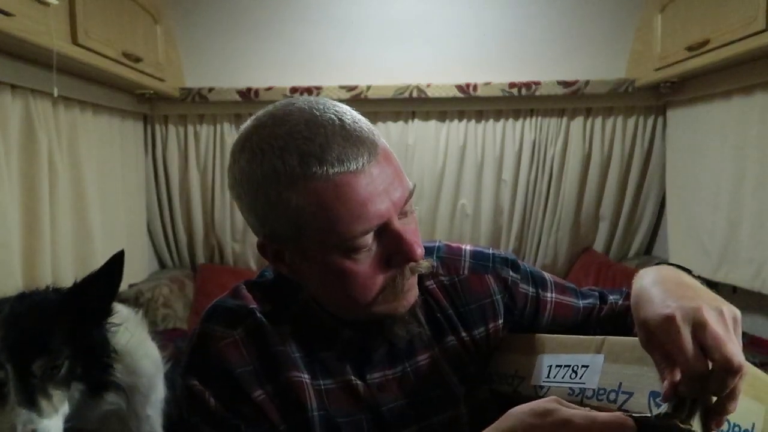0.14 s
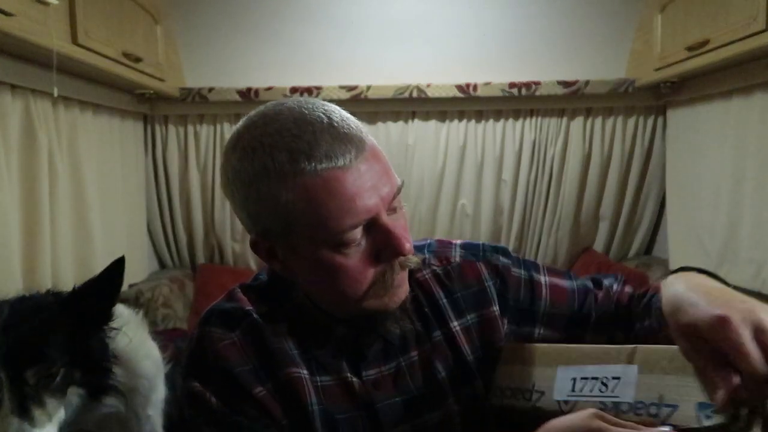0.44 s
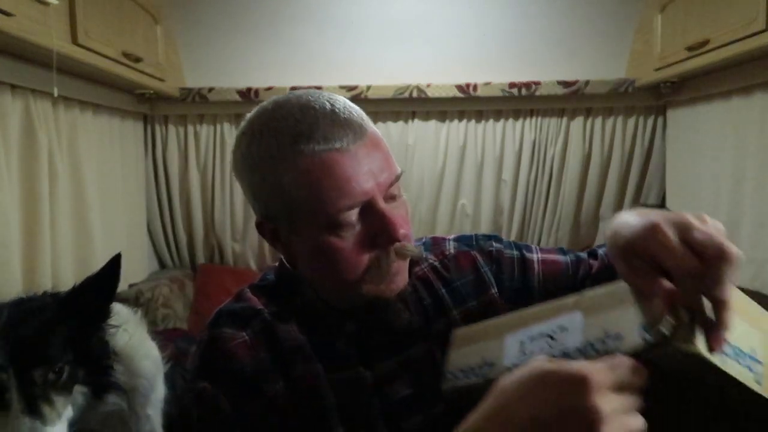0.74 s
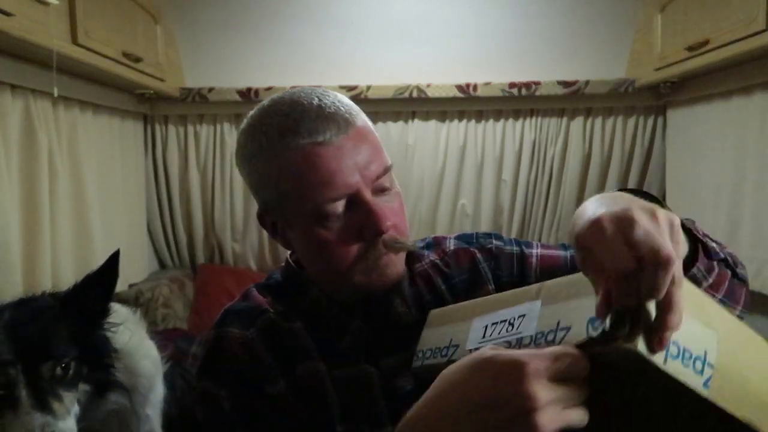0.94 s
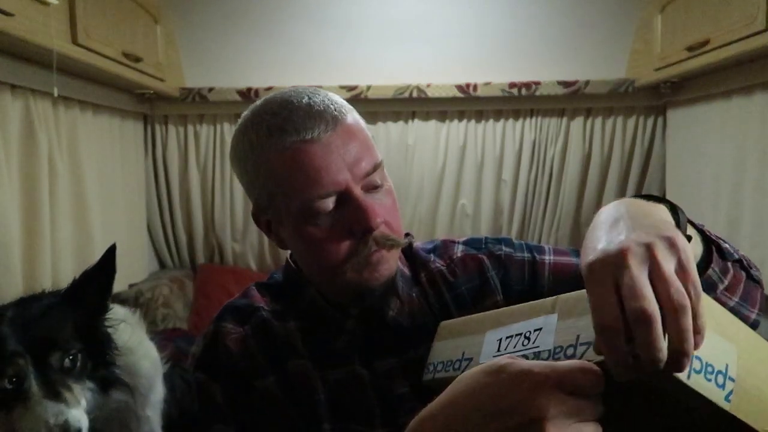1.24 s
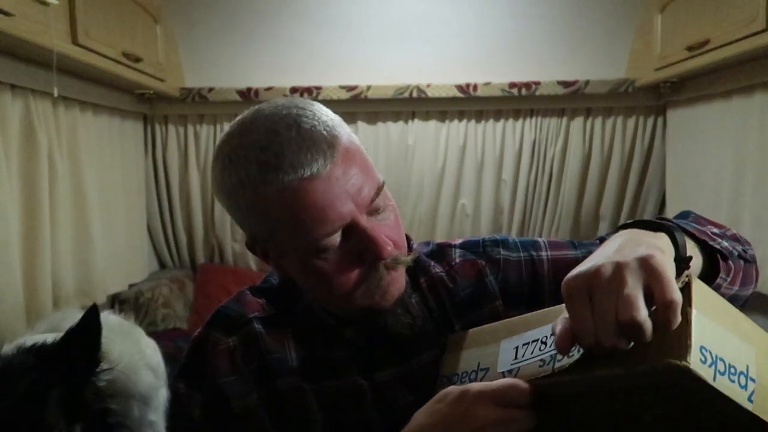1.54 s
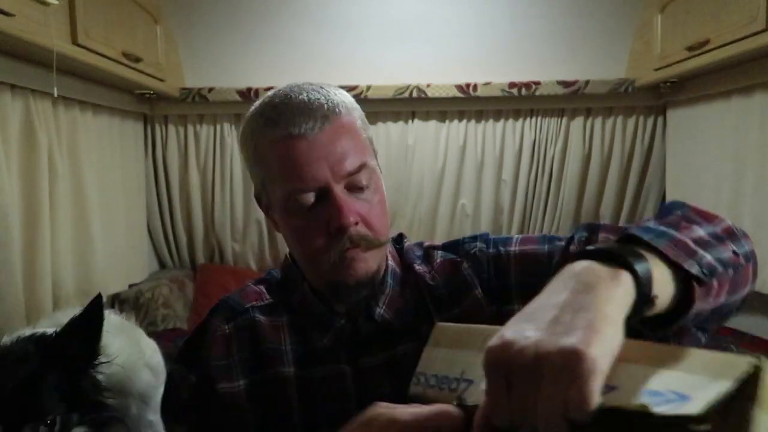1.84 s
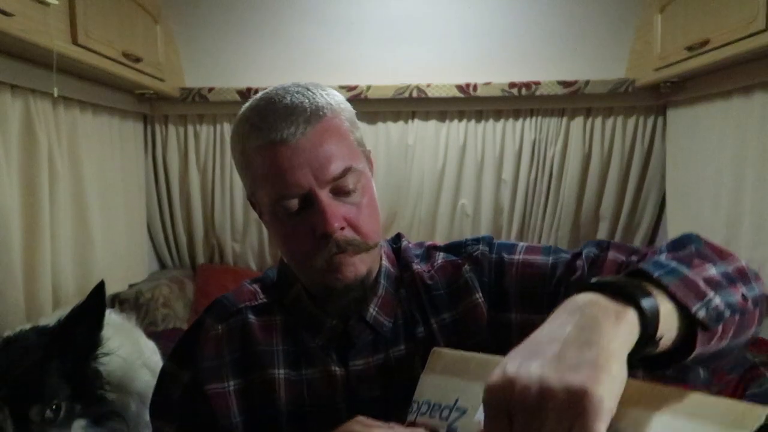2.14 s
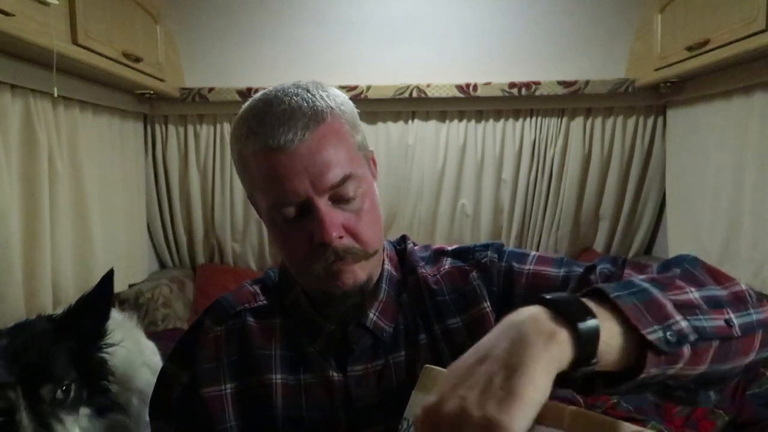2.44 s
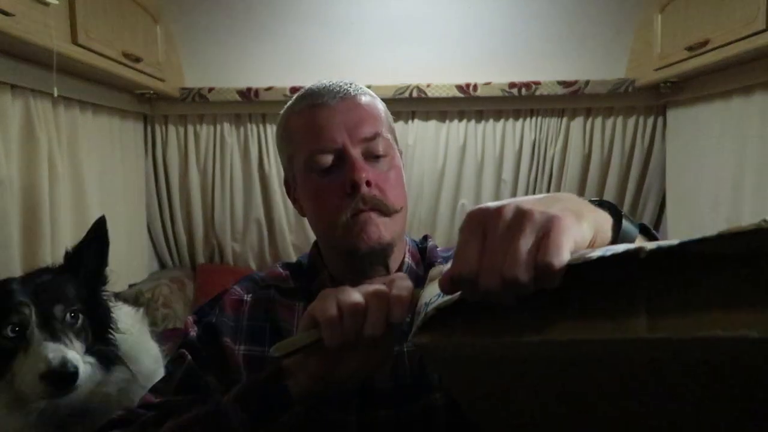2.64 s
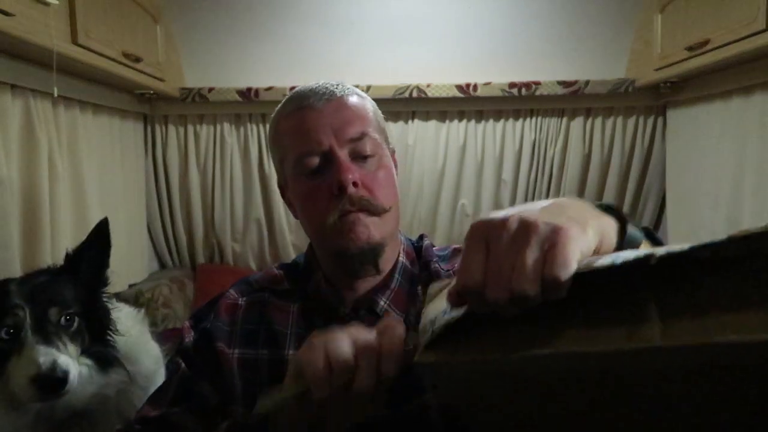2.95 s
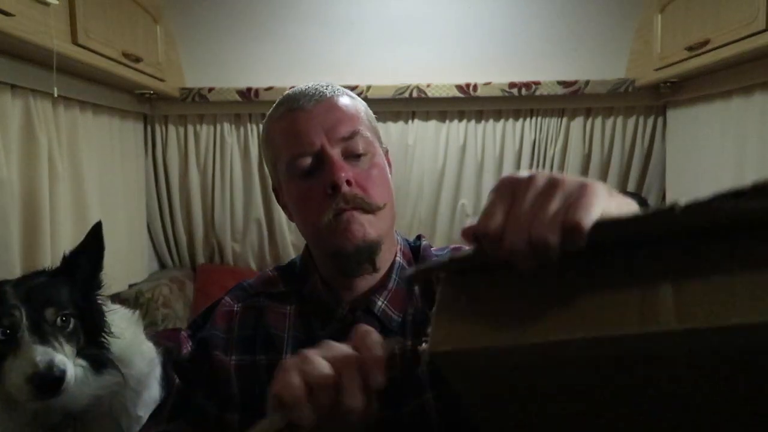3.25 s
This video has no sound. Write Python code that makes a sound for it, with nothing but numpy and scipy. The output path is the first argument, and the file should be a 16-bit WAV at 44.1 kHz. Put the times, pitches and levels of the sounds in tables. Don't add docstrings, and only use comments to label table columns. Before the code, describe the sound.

Cardboard box being cut open in short rasping strokes, with hollow thumps and a final crackling tear.

```python
import sys
import numpy as np
from scipy import signal
from scipy.fft import rfft, irfft
from scipy.io import wavfile
from scipy.ndimage import uniform_filter1d

SR = 44100
rng = np.random.default_rng(int(sys.argv[2]) if len(sys.argv) > 2 else 0)


def waveform_to_disk(signal):
    frames = np.transpose(np.atleast_2d(signal))
    scaled = np.clip(frames, -1, 1) * 32767
    samples = np.round(scaled).astype(np.int16)
    wavfile.write(sys.argv[1], SR, samples)


def rack_gain(trim_db):
    fader = np.asarray(trim_db, float)
    return 10 ** (fader / 20)


N = 149940


def evened(x):
    return x / np.sqrt(np.mean(x ** 2) + 1e-20)


def coloured(x, points):
    f, db = np.transpose(points)
    hz = np.fft.rfftfreq(len(x), 1 / SR)
    gain_db = np.interp(np.log(hz + 1), np.log(f + 1), db, left=db[0] - 30)
    return evened(irfft(rfft(x) * rack_gain(gain_db), len(x)))


def resonate(x, hz, width_hz):
    r = np.exp(-np.pi * width_hz / SR)
    return signal.lfilter([1 - r, 0, r - 1], [1, -2 * r * np.cos(2 * np.pi * hz / SR), r * r], x)


def clicks(per_s, spread_db):
    happens = rng.random(N) < per_s / SR
    sign = rng.choice([-1., 1.], N)
    size = np.minimum(rng.exponential(1, N), 4)
    return evened(happens * sign * rack_gain(spread_db * size))


def flutter(ms, depth_db):
    wander = uniform_filter1d(rng.standard_normal(N), max(int(ms * SR / 1000), 1))
    return rack_gain(depth_db * evened(wander))


def patchy(x, depth_db):
    z = signal.stft(x, nperseg=256)[2]
    field = uniform_filter1d(rng.standard_normal(z.shape), size=9, axis=0)
    field = uniform_filter1d(field, size=14, axis=1)
    return evened(signal.istft(z * rack_gain(depth_db * evened(field)), nperseg=256)[1][:N])


# pitch_hz, width_hz, level_db
BOX_RESONANCES = [(45, 17, -10.5), (99.7, 49, 2.5), (200, 70, 5), (270, 53, 6), (358, 50.6, 4.5),
                  (608, 262, 1), (917, 268, 2), (1400, 228, 1.5), (1556, 790, -3), (2304, 910, -12)]


def box(x):
    out = 0
    for k, (hz, width_hz, db) in enumerate(BOX_RESONANCES):
        out = out + (-1) ** k * rack_gain(db) * resonate(x, hz, width_hz)
    return out


# pitch_hz, density_db (per Hz)
AIR_COLOUR = [(12, -29.5), (20, 0), (251, -16), (361, -6), (440, -4), (4410, -27.5), (4790, -29.5),
              (14700, -37.5), (16500, -37)]


def still_air():
    hiss = coloured(rng.standard_normal(N), AIR_COLOUR)
    return rack_gain(-57) * hiss * flutter(60, 1.0)


TEAR_FROM_S = 2.6
# pitch_hz, density_db (per Hz)
FIBRE_COLOUR = [(1500, -22), (3000, 3), (4200, -2), (5800, 4.5), (7800, 2), (10000, 0.5), (13500, -14),
                (16000, -12)]
# pitch_hz, density_db (per Hz)
TEAR_COLOUR = [(1500, 9), (3500, -7), (5800, 1.5), (8500, -9), (12000, -11.5), (16000, -12.5)]
# start_s, length_s, fizz_db, box_db, bump_db
PALM_SLIDES = [(0., 0.17, -56.5, -45.5, -77), (0.254, 0.4, -60.5, -48, -62),
               (0.595, 0.22, -59, -49.5, -56.5), (0.763, 0.26, -55.5, -49.5, -60.5),
               (0.909, 0.28, -63, -52, -47), (1.161, 0.11, -55.5, -49, -61),
               (1.233, 0.33, -62.5, -52, -54.5), (1.822, 0.066, -61, -45, -56),
               (2.034, 0.19, -49.5, -44, -48), (2.25, 0.19, -56.5, -49, -48), (2.375, 0.21, -49, -49, -48),
               (2.642, 0.18, -62.5, -52, -77), (2.769, 0.15, -60, -51, -64), (2.915, 0.12, -56, -44, -43),
               (3.097, 0.068, -57, -44.5, -36.5), (3.159, 0.073, -54.5, -46, -46),
               (3.221, 0.098, -56, -53, -46.5)]


def palm_rubs():
    t = np.arange(N) / SR
    shape = np.zeros((3, N))
    for start, length, *levels_db in PALM_SLIDES:
        u = np.clip((t - start) / length, 0, 1)
        shape = shape + rack_gain(np.array(levels_db))[:, None] * np.sin(np.pi * u ** 1.03) ** 0.72
    rub_colour = FIBRE_COLOUR[:1] + [(2500, -0.5), (5800, 1.0), (8000, -4.0), (16000, -12.0)]
    grain = coloured(clicks(12000, 3.6), rub_colour)
    ticks = rack_gain(0.5) * (t > TEAR_FROM_S) * coloured(clicks(250, 2.8), TEAR_COLOUR)
    jolts = clicks(3000, 2.35)
    wall = evened(box(jolts) + 0.24 * resonate(jolts, 900, 260)) * flutter(22, 1.5)
    soft_bumps = np.convolve(clicks(160, 1.9), np.hanning(90))[:N]
    bumps = evened(box(soft_bumps))
    return shape[0] * (patchy(grain, 3.0) + ticks) + shape[1] * wall + shape[2] * bumps


# start_s, length_s, level_db, pitch_hz, width_hz
EDGE_DRAGS = [(0.86, 0.13, -61, 7600, 833.3), (2.388, 0.19, -50, 1530, 460),
              (3.116, 0.032, -39.5, 10300, 11000), (0.075, 0.17, -49.5, 2400, 1400),
              (0.051, 0.084, -60, 10000, 2800), (0.364, 0.14, -58.5, 3340, 1400),
              (2.2, .065, -50, 1760, 1100), (3.279, 0.021, -41, 1350, 370), (3.19, 0.033, -55, 1900, 900),
              (1.53, 0.085, -48, 13000, 4000), (0.18, .11, -48, 42, 30), (2.611, 0.033, -48.5, 1450, 2000)]


def squeaks():
    t = np.arange(N) / SR
    slips = clicks(11000, 9.1)
    out = np.zeros(N)
    for start, length, db, hz, width_hz in EDGE_DRAGS:
        swell = np.sin(np.pi * np.clip((t - start) / length, 0, 1)) ** 0.5
        tone = resonate(resonate(slips, hz, width_hz), hz, width_hz)
        out += rack_gain(db) * swell * evened(tone)
    return out


# start_s, length_s, fizz_db, box_db, drift_db (over the stroke)
STROKES = [(0.14, 0.018, -34.5, -37, 1), (0.16, 0.023, -40, -35, -1), (0.168, 0.04, -33.5, -31, -1.5),
           (1.447, 0.091, -50, -46.5, 9.5), (1.533, 0.074, -40.5, -36.5, 2.5),
           (1.614, 0.07, -39, -30, -10.5), (1.693, 0.12, -38.5, -36, -3), (1.876, 0.068, -37.5, -29.5, -7),
           (1.927, 0.035, -30, -28, -4), (1.965, 0.026, -33, -27, 1), (1.991, 0.041, -32.5, -25, -1),
           (2.026, 0.027, -41, -25.5, -16), (2.732, 0.058, -42, -37, -13.5), (2.82, 0.032, -43, -41.5, -3),
           (2.947, 0.019, -42.5, -44, -2), (2.966, 0.015, -49, -45, 5), (3.005, 0.017, -33.5, -23, -2),
           (2.979, 0.026, -35.5, -34, 1.5), (3.002, 0.051, -27.5, -23.5, -2),
           (3.052, 0.059, -42.5, -54, -9), (3.111, 0.029, -39.5, -37.5, -1), (3.276, 0.031, -36, -39, -16),
           (0.071, 0.11, -58, -49.5, 13)]


def cuts_and_tears():
    edge_in_s, edge_out_s = 0.0061, 0.0025
    t, fizz, drum = np.arange(N) / SR, np.zeros(N), np.zeros(N)
    for start, length, fizz_db, box_db, drift_db in STROKES:
        u = t - start
        gate = np.clip(u / edge_in_s, 0, 1) * np.exp(-np.maximum(u - length, 0) / edge_out_s)
        gate = gate * rack_gain(drift_db * np.clip(u / length, 0, 1))
        fizz += rack_gain(fizz_db) * gate
        drum += rack_gain(box_db) * gate
    jolts = clicks(per_s=2500, spread_db=3)
    crackle = clicks(per_s=12000, spread_db=4.5)
    cutting = coloured(crackle, FIBRE_COLOUR)
    tearing = coloured(crackle + 0.25 * clicks(700, 5), TEAR_COLOUR)
    crackle = np.where(t < TEAR_FROM_S, cutting, tearing)
    in_air = fizz * flutter(3.2, 1.2) * patchy(crackle, 2.2)
    in_box = box(drum * flutter(6.6, 3.78) * jolts) / np.std(box(jolts))
    return in_air + in_box


# start_s, peak_db, pitch_hz, push_db (weight of the slow push)
WALL_THUMPS = [(.1505, -15, 543, -13), (0.1616, -16, 555, -23), (.1738, -10.5, 560, -24),
               (.181, -10.5, 446, -4), (.7585, -27.5, 566, -22), (.946, -31.5, 517, -6),
               (1.001, -36.5, 241, -1), (1.041, -32, 252, 3), (1.095, -37, 250, 11),
               (1.113, -25.5, 270, 0.5), (1.134, -26.5, 320, -7), (1.398, -32.5, 530, -9),
               (1.536, -15, 260, -42), (1.621, -15, 463, -3.5), (1.7001, -16.5, 455, -0.5),
               (1.884, -7.5, 604, -13), (1.9275, -8.5, 1470, -10), (1.965, -9, 230, -13),
               (2.031, -8, 523, -7), (2.367, -31.5, 1440, -23), (2.613, -28.5, 2250, -28),
               (2.7415, -31.5, 287, -22), (2.9836, -17.5, 200, -25), (3.004, -8, 242, -25),
               (3.046, -10.5, 330, -14), (3.0898, -16, 516, 4), (3.184, -28.5, 500, 0.5),
               (3.2709, -24.5, 1400, -6), (3.282, -25.5, 890, -1), (.081, -32, 880, -12),
               (.122, -34, 890, -13), (.144, -22.5, 710, -15), (0.2058, -21, 586, -11), (.64, -38, 400, -8),
               (1.542, -17.5, 610, -6), (1.607, -31, 302, 2), (1.912, -16, 220, -5), (1.983, -17, 910, -15),
               (2.0007, -18.5, 1120, -6), (2.0115, -17, 910, -10), (2.399, -31.5, 1480, -10),
               (2.0325, -15, 1320, -21), (2.769, -32, 390, -14), (2.839, -27, 233, -5),
               (3.0101, -13, 1290, -3), (3.0378, -12, 305, -24), (3.034, -12, 320, -21),
               (3.136, -26.5, 300, -19), (1.9665, -11.5, 1510, -22), (3.258, -30, 370, -6)]


def thumps():
    ring_q, rattle_s, box_db = 3.12, 0.0043, -5
    out, t = np.zeros(N + 8192), np.arange(8192) / SR
    for start, db, hz, push_db in WALL_THUMPS:
        noise = rng.standard_normal(8192)
        blow = np.sin(np.pi * np.minimum(2.96 * hz * t, 1))
        rattle = np.convolve(noise * np.exp(-t / rattle_s), blow[:200])[:8192]
        blow = blow + 0.36 * rattle * np.sqrt(hz / SR)
        ring = resonate(blow, hz, hz / ring_q)
        hollow = box(blow + 1.92 * noise * np.exp(-t / 0.0016))
        push = resonate(blow, 65, 110)
        hit = 0
        for part_db, part in ((0, ring), (box_db, hollow), (push_db, push)):
            hit = hit + rack_gain(part_db) * part / abs(part).max()
        out[round(start * SR):][:8192] += rack_gain(db) * hit / abs(hit).max()
    return out[:N]


# start_s, peak_db, pitch_hz
FIBRE_SNAPS = [(0.0815, -28, 5400), (0.1502, -20, 5750), (0.177, -13, 5180), (0.267, -45, 5100),
               (1.3965, -37, 6910), (1.5358, -18, 6350), (1.6204, -19.5, 6030), (1.7, -15.5, 6400),
               (1.7443, -16.5, 8000), (1.8833, -14, 7200), (1.9266, -6, 6000), (1.966, -12, 6000),
               (2.0316, -17.5, 5500), (2.6614, -37.5, 6000), (2.7065, -41, 6500), (2.727, -37.5, 7150),
               (2.799, -32.5, 6900), (2.96, -26.5, 5960), (2.9874, -24, 5400), (3.013, -14, 5870),
               (3.018, -13, 6000), (3.0465, -9.5, 6100), (3.2705, -24.5, 5700), (0.1215, -34, 4550),
               (0.1295, -42, 7700), (0.182, -27, 4700), (0.208, -30, 5500), (0.5005, -41, 5300),
               (0.6755, -47, 6100), (1.37, -50, 5000), (1.426, -45, 7900), (1.459, -28.5, 3950),
               (1.708, -26, 6480), (1.733, -27, 7700), (1.838, -37, 5000), (2.078, -37, 5630),
               (2.2645, -43, 4550), (2.532, -37, 6300), (2.563, -47, 6500), (2.696, -39, 7000),
               (2.828, -38, 5900), (2.894, -43.5, 5600), (3.026, -14, 5800)]


def snaps():
    burst_s, ring_s = 0.001, 0.0047
    out, t = np.zeros(N + 2048), np.arange(2048) / SR
    for start, db, hz in FIBRE_SNAPS:
        push = (rng.standard_normal(2048) + 2.3 * (t == 0)) * np.exp(-t / burst_s)
        ring = 7.0 * resonate(push, hz, 6.0 / ring_s)
        crack = resonate(push, 7200, 2200) + 0.56 * resonate(push, 12800, 3300)
        hit = ring + crack
        out[round(start * SR):][:2048] += rack_gain(db) * hit / abs(hit).max()
    return out[:N]


# start_s, peak_db
TAPE_RELEASES = [(1.552, -23), (2.9412, -41), (2.961, -41), (2.9715, -35), (2.99, -22), (3.011, -22),
                 (3.017, -13.5), (3.025, -25), (3.04, -25), (3.065, -33), (3.078, -41), (3.0855, -39),
                 (3.094, -41)]


def tape_ticks():
    burst_s = 0.00056
    out, t = np.zeros(N + 512), np.arange(512) / SR
    for start, db in TAPE_RELEASES:
        burst = rng.standard_normal(512) * np.exp(-t / burst_s)
        hit = resonate(burst, 11500, 9000)
        out[round(start * SR):][:512] += rack_gain(db) * hit / abs(hit).max()
    return out[:N]


def room(x):
    t60_s = 0.2
    at = np.arange(130, SR // 2, 22)
    echoes = rng.choice([-1., 1.], len(at)) * rack_gain(-60 * at / SR / t60_s)
    taps = np.zeros(SR)
    taps[at + rng.integers(0, 22, len(at))] = echoes
    taps = signal.lfilter([1], [1, -0.35], taps)
    return signal.fftconvolve(x, taps / np.linalg.norm(taps))[:N]


def scene():
    air = still_air()
    near = palm_rubs() + squeaks() + cuts_and_tears() + thumps() + snaps() + tape_ticks()
    return (near + rack_gain(-18.5) * room(near) + air)[None]


def top_cut(x):
    return signal.sosfilt(signal.butter(12, 16970, fs=SR, output="sos"), x)


def record(dry):
    soft = 2 * np.tanh(dry / 2)
    lowpass = signal.firwin(255, 15700, fs=SR)[None]
    limited = signal.oaconvolve(soft, lowpass, "same")
    mix = limited + rack_gain(-32) * (soft - limited)
    return top_cut(mix)


dry = scene()
out = record(dry)
waveform_to_disk(out)
```